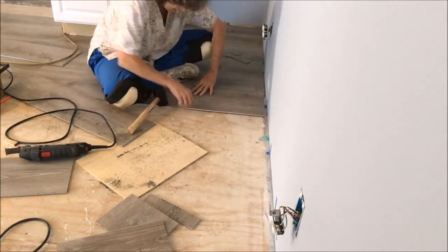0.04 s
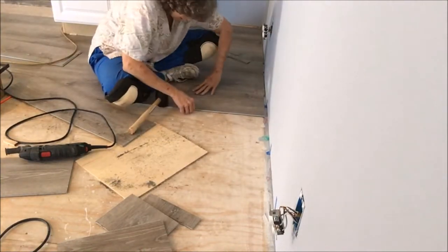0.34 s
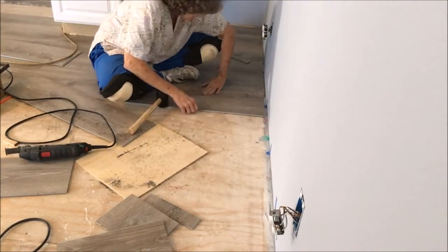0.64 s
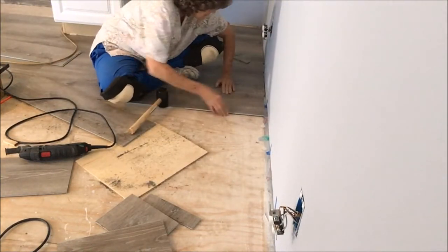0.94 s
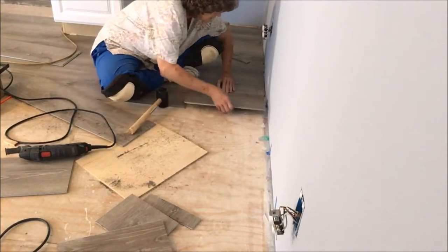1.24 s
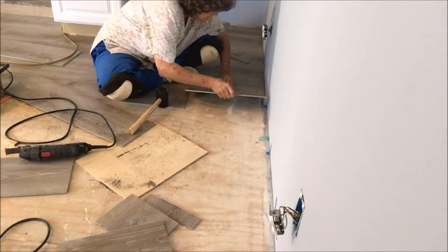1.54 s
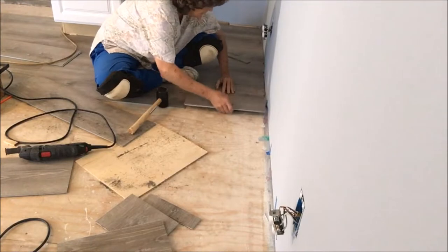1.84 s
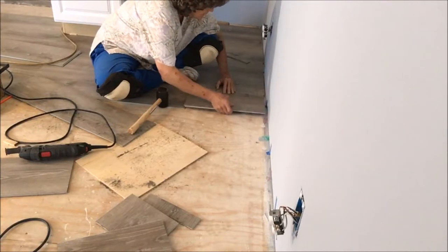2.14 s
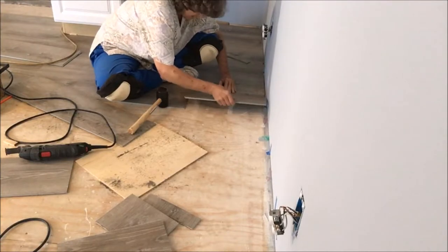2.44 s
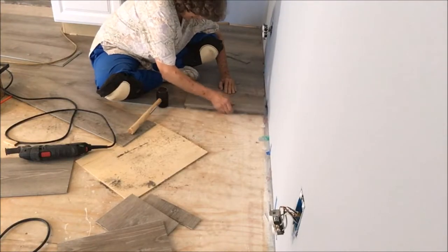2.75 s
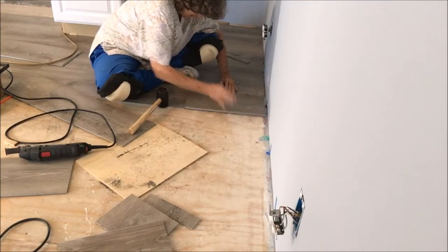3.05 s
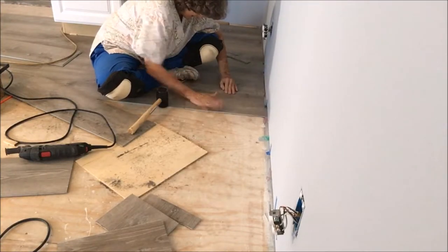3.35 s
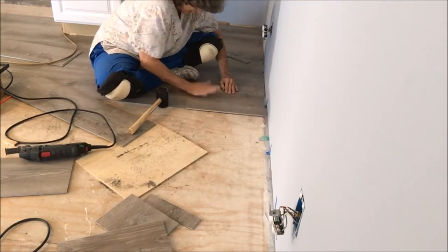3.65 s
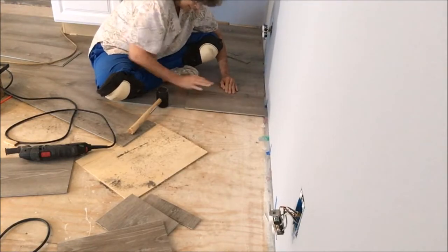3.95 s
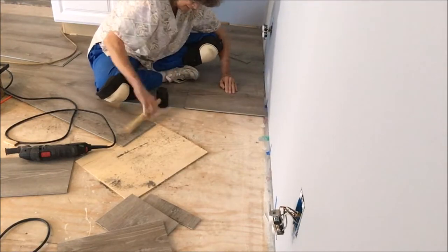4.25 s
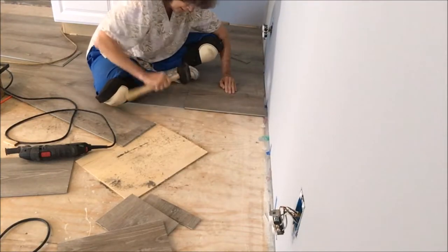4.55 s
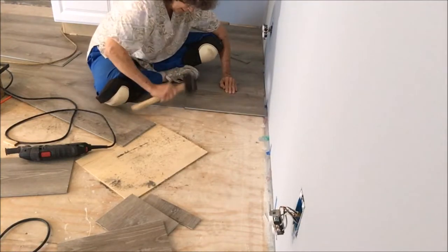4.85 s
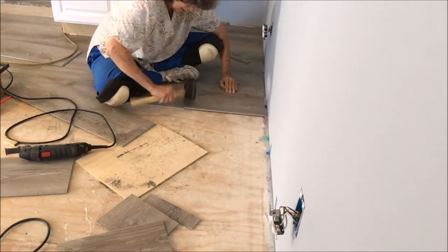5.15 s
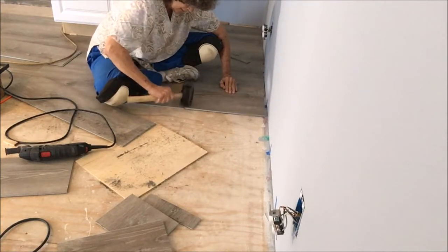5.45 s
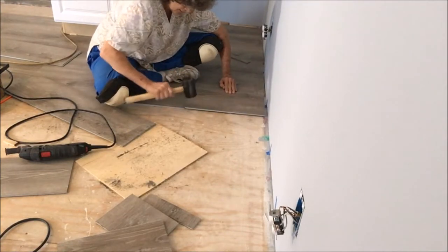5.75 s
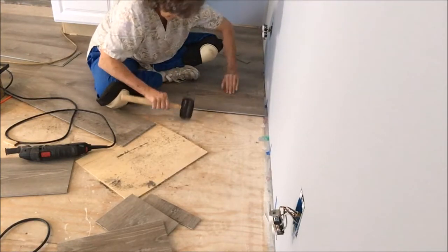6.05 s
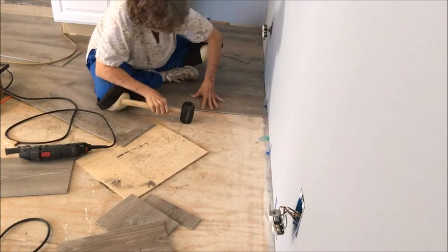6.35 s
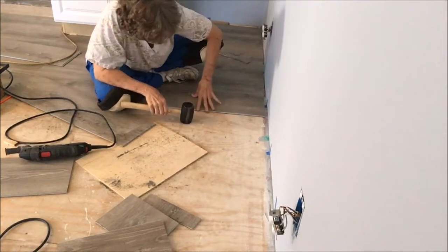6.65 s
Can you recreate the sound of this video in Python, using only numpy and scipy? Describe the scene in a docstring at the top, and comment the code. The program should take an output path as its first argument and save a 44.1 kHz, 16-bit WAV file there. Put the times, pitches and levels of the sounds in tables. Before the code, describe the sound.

Light knocks and a hand slap on a floor plank, then four booming rubber mallet blows over a faint fan-like hum.

```python
"""Fitting a vinyl plank

One microphone in a bare room with a plywood subfloor. A plank drops and rocks to rest, is slid along
its joint, knocked and slapped down by hand, then driven home with four blows of a rubber mallet,
which is finally set down. The plank clacks and rings, the floor booms on its joists and the walls
answer. In the background runs something like a fan."""
import sys
import numpy as np
from scipy import signal
from scipy.fft import rfft, irfft, next_fast_len
from scipy.io import wavfile
from scipy.ndimage import uniform_filter1d, minimum_filter1d

SR = 44100
rng = np.random.default_rng(int(sys.argv[2]) if len(sys.argv) > 2 else 0)


def bounce(signal):
    """Save signal as a 16-bit WAV file at the path given by the first command-line argument."""
    frames = np.transpose(np.atleast_2d(signal))
    limited = np.clip(frames, -1, 1)
    pcm = np.round(limited * 32767).astype(np.int16)
    wavfile.write(sys.argv[1], SR, pcm)


N = 295514
T = np.arange(SR) / SR  # time since a contact, s


# Hard blows: the plank landing, a palm, then the mallet four times. Columns: t/s, thud level/dB,
# thud top f/Hz, clack level/dB, clack top f/Hz, ring level/dB, favoured ring f/Hz,
# snap level/dB, snap top f/Hz
BLOWS = [(-.010, -14, 900, -31, 2480, -19, 2470, -26, 3000),
         (3.4104, -1.5, 176, -16, 1360, -21.5, 875, -12.5, 14700),
         (4.7383, 0.5, 1180, -23, 7400, -20, 3740, -12.5, 8000),
         (5.0005, 0.5, 1200, -22.5, 9300, -15.5, 4360, -12, 9000),
         (5.2770, -5, 900, -21, 9300, -15, 4600, -20, 8000),
         (5.5365, -1, 1200, -23.5, 8000, -16.5, 6430, -13, 9000)]
def blows(wet_db=-2.5, wall_paths=3):
    """Each blow claps the plank down, makes it ring and sets the floor booming."""
    out = np.zeros(N)
    for s, thud_db, thud_hz, clack_db, clack_hz, ring_db, ring_hz, snap_db, snap_hz in BLOWS:
        # each direction gets its own colour of clap: one meets the microphone, the rest the walls
        direct, *outward = [clap(clack_db, clack_hz, snap_db, snap_hz) for _ in range(wall_paths + 1)]
        reflected = sum(map(walls, outward)) / np.sqrt(wall_paths)
        add(out, s, direct + amp(wet_db) * reflected)
        add(out, s, in_room(amp(ring_db) * plank_ring(ring_hz), wet_db=-11))
        boom = amp(thud_db) * floor_thud(low_hz=20, top_hz=thud_hz)
        add(out, s + 0.00061, in_room(boom, wet_db=-12.5))
    return out


# Spectra of the joint snapping and of vinyl meeting plywood: f/Hz, level/dB per Hz
SNAP_SPECTRUM = [(500, -4.5), (1500, 4.5), (4500, -3), (7000, -3.5), (10000, -16.5), (16000, -16.5)]
CLACK_SPECTRUM = [(150, 6.5), (400, -7.5), (560, -4.5), (760, 2), (1000, -0.5), (1400, -2.5), (2000, -7),
                  (3000, -10.5), (5000, -15), (7000, -15), (10000, -25), (16000, -22)]
def clap(clack_db, clack_hz, snap_db, snap_hz):
    """The joint snaps shut, and a moment later the plank claps on the plywood."""
    snap = cut(noise(SNAP_SPECTRUM, SR) * fade(0.011), snap_hz, "low", order=1)
    clack = noise(CLACK_SPECTRUM, SR) * fade(0.18) * (1 - fade(0.0043))
    clack = cut(clack, clack_hz, "low", order=1)
    return amp(snap_db) * snap + amp(clack_db + 5) * clack


# The plank, from its broad bending modes up to its stiff edge: f/Hz, level/dB, t60/s
PLANK_MODES = [(727, -9.5, 0.037), (900, -15, 0.12), (880, -68, 0.066), (1330, -10, 0.063),
               (1405, 0.5, 0.029), (2263, 7, 0.0054), (2832, 1, 0.012), (3622, 6, 0.0088),
               (4294, 4, 0.0085), (5360, -14.5, 0.025), (5950, 1.5, 0.0083)]
def plank_ring(favoured_hz, favour_db=7, favour_octaves=0.31):
    """The plank rings briefly; the spot that is struck favours the modes near one frequency."""
    hz, db, t60 = np.transpose(PLANK_MODES)[:, :, None]
    db = db + 1.5 * rng.standard_normal(hz.shape)
    db = db + favour_db * np.exp(-(np.log2(hz / favoured_hz) / favour_octaves) ** 2)
    hz = hz * (1 + .01 * rng.standard_normal(hz.shape))
    sign = rng.choice([-1, 1], hz.shape)
    return modes(hz, sign * amp(db), t60, build_cycles=0.45)


# The subfloor on its joists; close pairs beat, so the boom swells before it dies: f/Hz, level/dB, t60/s
FLOOR_MODES = [(41, -24.1, .09), (48.7, -26.9, .45), (55.5, -28.8, .35), (82.1, -2.8, .13), (81, -2, .13),
               (103.8, -4.9, .12), (110.4, -5.8, .09), (131.6, -25.9, .45), (161.3, -16.8, .14),
               (180.9, -17, .25), (205.5, -15.6, .18), (233, -22.5, .38), (245.2, -36.9, .37),
               (270, -8.9, .08), (313, -9.8, .09), (316.6, -11.5, .08), (360, -24.5, .2), (437, -36.5, .32),
               (493.5, -36, .15), (665, -26, .14)]
def floor_thud(low_hz, top_hz):
    """The subfloor booms; a soft contact leaves out its upper modes, a light one its lowest."""
    hz, db, t60 = np.transpose(FLOOR_MODES)[:, :, None]
    sign = (-1) ** np.arange(len(hz))[:, None]  # neighbouring modes swing in opposite senses
    boom = modes(hz, sign * amp(db), t60, build_cycles=0.065)
    return cut(cut(boom, low_hz, "high", order=1), top_hz, "low", order=2)


# Air under the flat plank, the cupped hand and the mallet's side: t/s, level/dB, hollow f/Hz, top f/Hz
AIR_POPS = [(-.006, -21.5, 308, 397), (3.411, -11, 340, 414), (6.19, -18.5, 337, 423)]
def pops():
    """Trapped air pops out when something broad lands flat."""
    out = np.zeros(N)
    for s, db, hollow_hz, top_hz in AIR_POPS:
        add(out, s, knock(db, hollow_hz, top_hz, wet_db=-8.5))
    return out


# Soft landings on the floor: t/s, level/dB, low edge f/Hz, top f/Hz
SOFT_BUMPS = [(1.024, -20, 730, 500), (1.075, -12, 1100, 454), (3.012, -27.5, 250, 400),
              (3.752, -13, 16, 151), (6.1878, -2, 215, 380), (6.238, -9, 92, 400)]
def bumps():
    """Hand, plank and mallet come to rest on the floor."""
    out = np.zeros(N)
    for s, db, low_hz, top_hz in SOFT_BUMPS:
        add(out, s, bump(db, top_hz, low_hz))
    return out


def bump(db, top_hz, low_hz=15):
    """Soft weight on the floor stirs mainly its low modes."""
    return in_room(amp(db) * floor_thud(low_hz, top_hz), wet_db=-13)


def rocking(start_s=.231, first_gap_s=.158, gap_shrink=.76):
    """The dropped plank rocks ever faster, softer and duller until it lies still."""
    out, s = np.zeros(N), start_s
    for touch in range(5):
        add(out, s, bump(db=-16.5 - 2 * touch, top_hz=185 * 0.71 ** touch))
        s += first_gap_s * gap_shrink ** touch
    return out


# Light hollow knocks of plank and tool: t/s, level/dB, hollow f/Hz
LIGHT_KNOCKS = [(1.083, -36.5, 304), (1.346, -50.5, 474), (2.075, -30, 261), (2.176, -30, 258),
                (2.624, -23, 264), (2.840, -25, 315), (3.011, -35.5, 750), (3.074, -38.5, 770),
                (5.828, -21.5, 660), (5.919, -32, 635), (6.242, -19.5, 695)]
def knocks(reference_hz=620, reference_db=-30, db_per_octave=7.5, sag_top_hz=54.6):
    """The harder a knock, the brighter it is and the further the joists give under it."""
    out = np.zeros(N)
    for s, db, hollow_hz in LIGHT_KNOCKS:
        contact_hz = reference_hz * 2 ** ((db - reference_db) / db_per_octave)
        top_hz = np.hypot(contact_hz, hollow_hz)  # the hollow always sounds
        add(out, s, knock(db, hollow_hz, top_hz, wet_db=-3.5))
        sag = bump(db + 11, sag_top_hz)
        add(out, s, cut(sag, sag_top_hz, "low", order=4))
    return out


def knock(db, hollow_hz, top_hz, wet_db, rattle_db=-24, hollow_db=7):
    """One sharp contact and a brief rattle, coloured by the hollow beneath."""
    force = amp(rattle_db) * rng.standard_normal(SR) * fade(.1) * (1 - fade(.04))
    force[0] += 1  # the contact leads the rattle
    add(force, 0.018, amp([-8]))  # a strong early reflection
    hollow = signal.lfilter(*signal.iirpeak(hollow_hz, Q=4, fs=SR), force)
    sound = cut(force + amp(hollow_db) * hollow, 0.58 * hollow_hz, "high", order=3)
    sound = cut(sound, top_hz, "low", order=6)
    return in_room(amp(db) * sound / np.abs(sound).max(), wet_db)


# Pushes of the plank along its joint: fastest moment t/s, level/dB, length/s
PUSHES = [(0.89, -55, 0.68), (1.357, -69, 0.23), (2.41, -62, 0.063), (3.057, -57, 0.18),
          (4.362, -67.5, 0.38), (6.088, -54.5, 0.26), (6.567, -64.5, 0.21)]
# The tongue rubbing in the groove: f/Hz, level/dB per Hz
SCRAPE_SPECTRUM = [(500, -30), (2000, 2.5), (4000, -2), (7000, -2), (10000, -12.5), (16000, -15.5)]
def joint_scrape(swell_db=16, speed_up_share=0.6, grit_db=1.9):
    """The tongue scrapes in the groove, swelling and dying with the speed of each push."""
    t, speed = np.arange(N) / SR, np.zeros(N)
    for s, db, length in PUSHES:
        from_peak = np.maximum((s - t) / speed_up_share, (t - s) / (1 - speed_up_share)) / length
        speed += amp(db - swell_db * from_peak)
    grit = unit(uniform_filter1d(rng.standard_normal(N), size=200))
    return speed * amp(grit_db * grit) * noise(SCRAPE_SPECTRUM, N)


# Small ticks of joint and tool: t/s, level/dB, top f/Hz
TICKS = [(1.072, -38.5, 5500), (3.011, -46, 12000), (3.077, -47, 12000), (6.105, -40, 14000),
         (6.1878, -34, 3460)]
def ticks():
    """The joint ticks where it catches, and so does the tool."""
    out = np.zeros(N)
    for s, db, top_hz in TICKS:
        tick = cut(noise(SNAP_SPECTRUM, SR) * fade(t60=.05), top_hz, "low", order=2)
        add(out, s, in_room(amp(db) * tick, wet_db=-3.5))
    return out


# Reverberation of the bare room around the microphone: f/Hz, t60/s
ROOM_DECAY = [(100, 0.37), (400, 0.43), (1000, 0.84), (2500, 1), (5000, 0.7), (9000, 0.72), (16000, 0.22)]
def walls(x, build_s=0.00068):
    """The bare walls answer a sound, each frequency dying at its own speed."""
    hz, t, spectra = signal.stft(rng.standard_normal(SR), SR, nperseg=256)
    decay = np.exp(-np.log(1000) * t / along(ROOM_DECAY, hz)[:, None])
    tail = signal.istft(spectra * decay, SR, nperseg=256)[1][:SR]
    tail *= 1 - np.exp(-(T / build_s) ** 2)  # the first reflections take a moment to arrive
    return signal.fftconvolve(x, tail / np.linalg.norm(tail))[:SR]


def in_room(x, wet_db):
    """What reaches the microphone: the direct sound and the walls' answer."""
    return x + amp(wet_db) * walls(x)


# Casing resonances of the fan in the background: f/Hz, width/Hz, level/dB
CASING_RESONANCES = [(64, 15.8, 1.5), (177.1, 2.97, 8), (550, 13, -11), (1026, 11.6, 0.5), (1312, 91, -13),
                     (1708, 162, -9.5), (2504, 148, -12.5), (3174, 38, -18), (3800, 57, -12.5),
                     (4570, 130, -22.5), (6060, 375, -27)]
# Its rush of air: f/Hz, level/dB per Hz
AIR_SPECTRUM = [(25, -34), (55, 4), (100, -7.5), (250, -0.5), (400, -7), (700, -6), (950, -1), (1500, -7.5),
                (2100, -13.5), (4000, -13.5), (5300, -26), (7000, -28.5), (9000, -34.5), (16000, -41)]
def fan(casing_db=-51.5, air_db=-56):
    """A steady rush of air, partly ringing in the resonances of a casing."""
    def casing(f):
        peaks = (amp(db) / (1 + ((f - hz) / width) ** 2) for hz, width, db in CASING_RESONANCES)
        return np.sqrt(sum(peak ** 2 for peak in peaks))
    hum = unit(filtered(rng.standard_normal(N), casing))
    return amp(casing_db) * hum + amp(air_db) * noise(AIR_SPECTRUM, N)


def amp(db):
    """Decibels to gain."""
    return 10 ** (np.asarray(db) / 20)


def unit(x):
    """Scale to rms 1."""
    return x / np.sqrt(np.mean(x ** 2) + 1e-20)


def fade(t60):
    """A decay that loses 60 dB in t60 seconds."""
    return np.exp(-np.log(1000) * T / t60)


def modes(hz, gain, t60, build_cycles):
    """Struck modes build up, swing and die away together."""
    swing = np.sin(2 * np.pi * hz * T) * (1 - np.exp(-T * hz / build_cycles))
    return np.sum(gain * fade(t60) * swing, axis=0)


def along(points, hz):
    """Interpolate (f/Hz, value) points on a log frequency axis."""
    f, values = np.transpose(points)
    return np.interp(np.log(hz + 1), np.log(f + 1), values)


def filtered(x, response):
    """Shape x by a gain that depends on frequency."""
    size = next_fast_len(len(x) + SR // 4)
    hz = np.fft.rfftfreq(size, 1 / SR)
    return irfft(rfft(x, size) * response(hz), size)[:len(x)]


def noise(spectrum, size):
    """Coloured noise of rms 1."""
    return unit(filtered(rng.standard_normal(size), lambda hz: amp(along(spectrum, hz))))


def cut(x, hz, kind, order):
    """Causal low-pass or high-pass."""
    return signal.sosfilt(signal.butter(order, min(hz, SR / 2 - 1), kind, fs=SR, output="sos"), x)


def add(track, s, sound):
    """Mix a sound into the track at time s; a start before zero leaves only its tail."""
    start = round(s * SR)
    sound = sound[max(-start, 0):]
    part = track[max(start, 0):][:len(sound)]
    part += sound[:len(part)]


def scene():
    """The work on the floor and the fan behind it, all at one microphone."""
    return (blows() + pops() + rocking() + bumps() + knocks() + joint_scrape() + ticks() + fan())[None]


def record(dry, ceiling=.5, rumble_hz=30, top_hz=15900):
    """A fast limiter holds the blows down; the microphone loses deep rumble and the highest treble."""
    needed_gain = ceiling / np.maximum(np.abs(dry[0]), ceiling)
    gain = uniform_filter1d(minimum_filter1d(needed_gain, size=45), size=45)  # about 1 ms
    passband = lambda hz: (hz < top_hz) / np.hypot(1, (rumble_hz / (hz + 1)) ** 4)
    return filtered(dry[0] * gain, passband)[None]


dry = scene()
out = record(dry)
bounce(out)
```